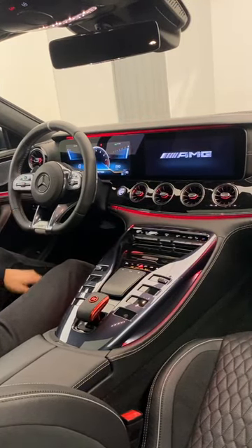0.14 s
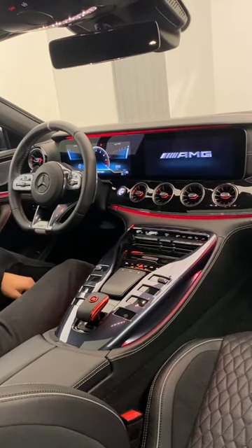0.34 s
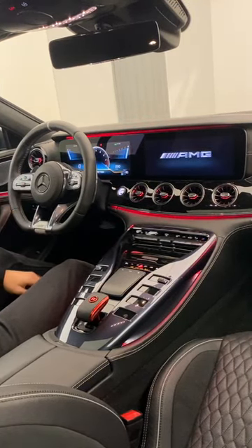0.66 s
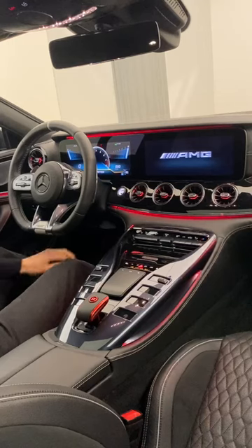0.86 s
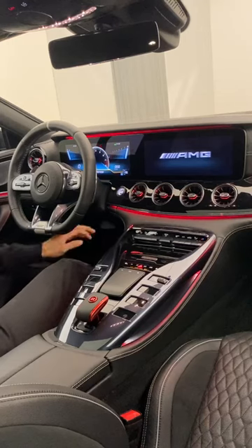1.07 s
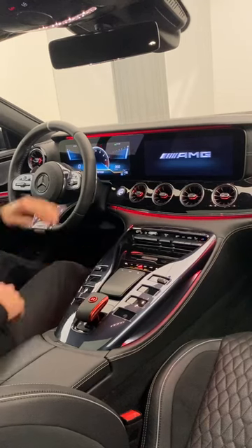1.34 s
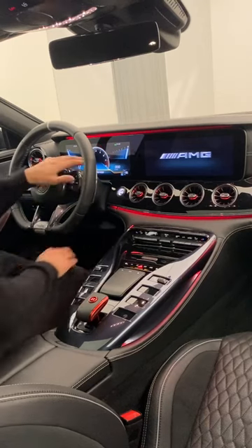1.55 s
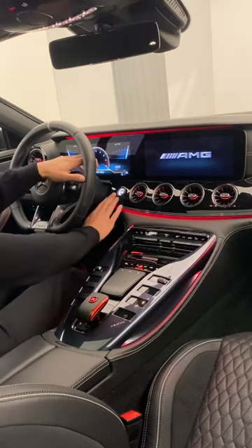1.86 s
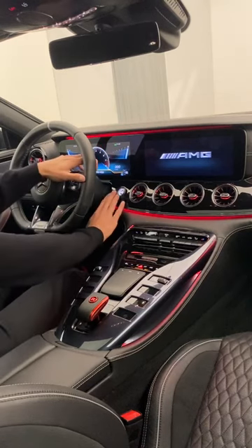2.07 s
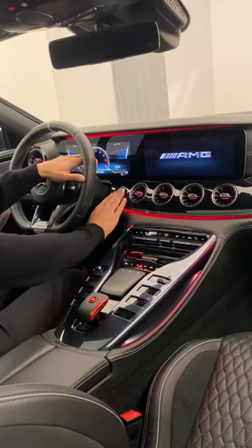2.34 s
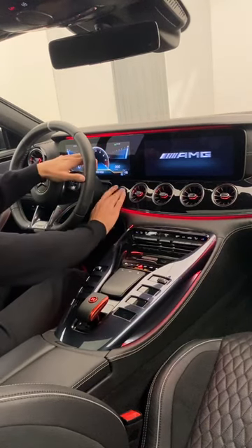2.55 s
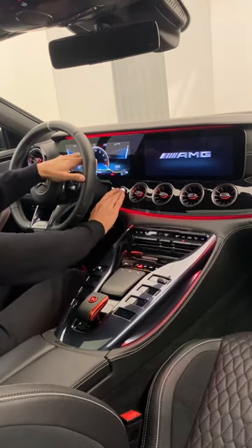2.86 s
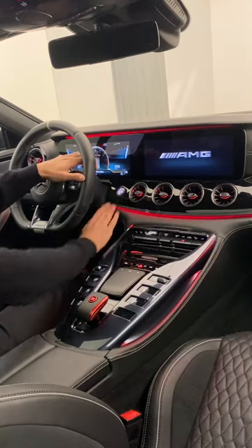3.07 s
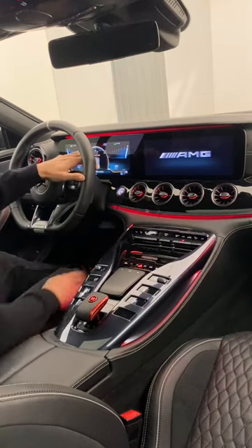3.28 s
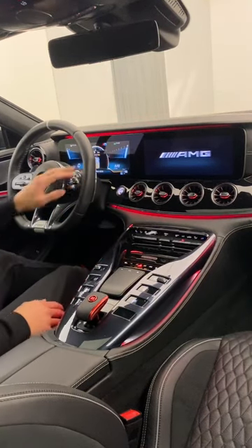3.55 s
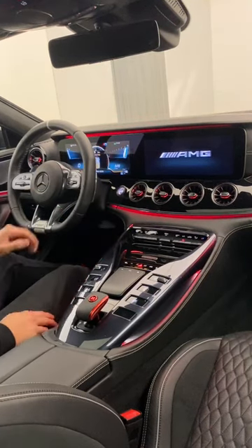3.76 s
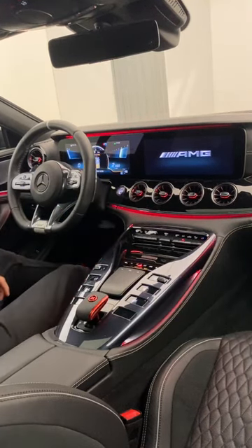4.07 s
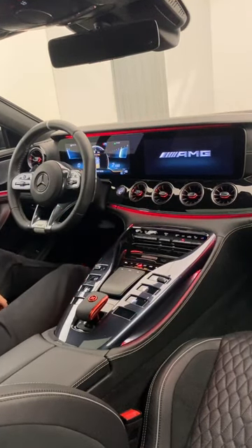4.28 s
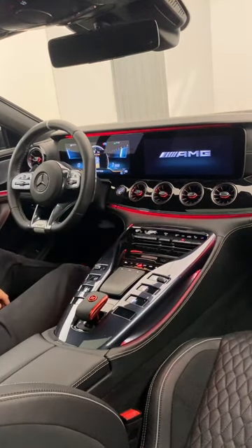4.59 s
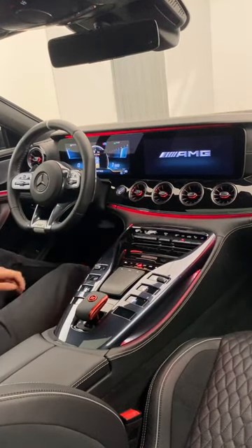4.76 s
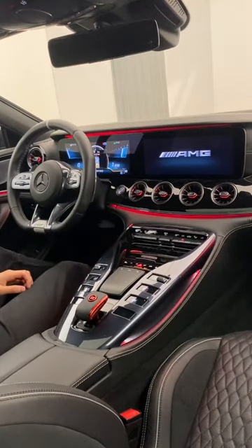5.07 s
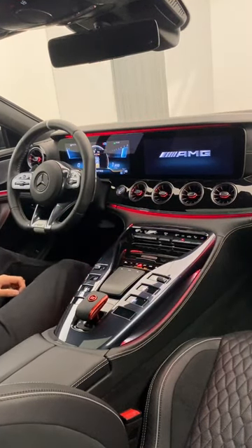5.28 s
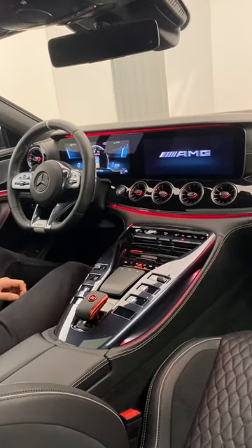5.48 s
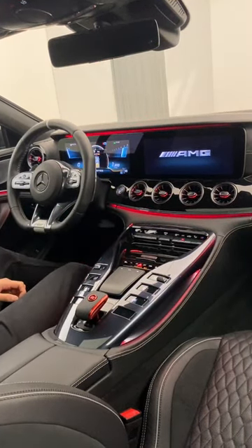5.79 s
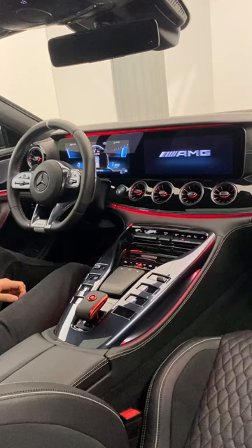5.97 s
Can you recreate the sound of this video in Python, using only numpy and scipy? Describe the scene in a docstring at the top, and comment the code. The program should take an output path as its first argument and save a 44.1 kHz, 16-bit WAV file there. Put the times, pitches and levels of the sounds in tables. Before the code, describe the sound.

Quiet cabin rustle and switch clicks, a dull foot thud, a sharp button click, then an eight-cylinder engine barks awake and sinks into a booming fast idle.

```python
"""An eight-cylinder engine heard from inside a closed car: a starter whirrs it round, it catches, flares,
burbles as the revs fall and settles to a booming fast idle. Its tones follow one firing-rate curve; uneven
firings ring cabin booms, and coloured noise pulses as roar and hiss. Decaying contact rattles ring trim and
switches as clicks, soft pushes ring the floor pan under the pedal, and swelling noise is the driver's seat."""
import sys
import numpy as np
from scipy import signal
from scipy.fft import rfft, irfft
from scipy.io import wavfile

SR = 44100
rng = np.random.default_rng(int(sys.argv[2]) if len(sys.argv) > 2 else 0)


def gain_from_db(level_db):
    """Convert decibel levels to linear amplitude factors (20 dB per decade)."""
    decades = np.asarray(level_db, float) / 20
    return 10 ** decades


def inscribe(sig):
    """Save sig as 16-bit PCM at rate SR to the path in sys.argv[1].

    A 1-D sig is mono; a 2-D sig holds one channel per row.
    Samples are clipped to [-1, 1] before scaling.
    """
    pcm = np.round(np.clip(np.atleast_2d(sig).T, -1, 1) * 32767)
    wavfile.write(sys.argv[1], SR, pcm.astype(np.int16))


N = 270333
HZ = np.maximum(np.arange(N // 2 + 1) * SR / N, 1)   # frequency grid of the whole scene

# cabin booms: (f/Hz, width/Hz, relative level/dB)
CABIN = [(47, 24, -1.5), (74.8, 27, 2), (148.2, 30, -7), (226, 41, -19.5), (267, 58, -27.5)]
# colour of the engine roar: (f/Hz, relative level/dB)
ROAR = [(88, -29), (150, -5), (183, -11.5), (232, -8), (345, -17.5), (492, -25.5), (533, -28), (761, -35),
        (901, -36.5), (985, -36), (1600, -56.5), (2080, -86), (3520, -120)]
# left-right likeness of diffuse sound: (f/Hz, likeness from -1 to 1)
LIKENESS = [(60, 1), (140, 0.9), (350, .6), (830, -0.44), (1400, 0.21), (2000, 0.7), (2800, .1),
            (4300, 0.28), (5200, -0.6), (7500, -.97)]
# balance, the engine side being louder: (f/Hz, left over right/dB)
LEFT_DB = [(30, -0.5), (80, 1.5), (140, 3), (350, 7), (830, 1.5), (2000, -0.5), (4800, -1), (9000, 3)]


def rms_one(x):
    """Scale to unit rms."""
    return x / np.sqrt(np.mean(x ** 2) + 1e-20)


def in_time(rows):
    """Columns of a time curve, read at every sample."""
    s, *columns = np.transpose(rows)
    return [np.interp(np.arange(N) / SR, s, column) for column in columns]


def at_hz(points):
    """A spectrum table read on the frequency grid, along log frequency."""
    hz, value = np.transpose(points)
    return np.interp(np.log(HZ), np.log(hz), value)


def ramp(from_s, rise_s):
    """Straight rise from 0 to 1."""
    return np.clip((np.arange(N) / SR - from_s) / rise_s, 0, 1)


def drift(rate):
    """Slow chance with spread 1: noise smoothed by two equal poles, one knot every 64 samples."""
    knots = rng.standard_normal(N // 64 + 2002)
    r = np.exp(-128 * np.pi * rate / SR)
    smooth = signal.lfilter([1], [1, -2 * r, r * r], knots)[2000:]   # leaves out the filter's start
    return np.interp(np.arange(N) / 64, np.arange(N // 64 + 2), rms_one(smooth))


def ring(x, hz, t60):
    """A unit click sets a sine of height 1 ringing; it falls 60 dB in t60 seconds."""
    r = gain_from_db(-60 / (t60 * SR))
    w = 2 * np.pi * hz / SR
    return signal.lfilter([0, np.sin(w)], [1, -2 * r * np.cos(w), r * r], x + 1e-18)


def ring_width(x, hz, width_hz):
    """A ring whose decay is set by the width of its resonance."""
    return ring(x, hz, np.log(1000) / np.pi / width_hz)


def resonate(x, modes):
    """Parallel resonances of alternating sign, given by centre, width and height."""
    total = 0
    for k, (hz, width_hz, db) in enumerate(modes):
        total = total + gain_from_db(db) * (-1) ** k * width_hz * ring_width(x, hz, width_hz)
    return total


def diffuse(spectrum, lean=1):
    """Stereo noise of a given colour, with left-right likeness set by frequency; rms 1."""
    mid, side = rfft(rng.standard_normal((2, N))) * gain_from_db(at_hz(spectrum))
    alike = np.clip(at_hz(LIKENESS), -1, 1)
    sides = np.sqrt(1 + alike) * mid + np.sqrt(1 - alike) * side * [[1], [-1]]
    balance = gain_from_db(lean * at_hz(LEFT_DB) * [[.5], [-.5]])
    return rms_one(irfft(sides * balance, N))


def ports(x, lean=1):
    """A nearby source reaches the two microphone ports with unequal level and phase."""
    # phase between the ports: (f/Hz, left lead/rad)
    lead = [(50, -0.16), (110, 0.31), (430, 0.64), (750, -2), (1400, -0.1), (2900, 1), (4900, -0.04),
            (7000, 4)]
    tilt = gain_from_db(lean * at_hz(LEFT_DB) / 2) * np.exp(.5j * at_hz(lead))
    return irfft(rfft(x) * [tilt, 1 / tilt], N)


def firing_tone(per_s, turns, shut):
    """A nearly pure tone at the firing rate, as loud as the body lets each pitch through."""
    # firing tone through the body: (f/Hz, level/dB)
    body = [(40, -44), (52, -30.5), (64, -30), (80, -11), (88, -15), (96, -21), (104, -26), (114, -30),
            (128, -18.5), (146, -23.5), (160, -29)]
    overrun_db = -10   # weaker firings with the throttle shut
    tone_db = np.interp(per_s, *np.transpose(body)) + overrun_db * shut
    wave = np.sin(2 * np.pi * turns) + gain_from_db(-32.5) * np.sin(4 * np.pi * turns)
    return np.sqrt(2) * gain_from_db(tone_db) * wave


def belt_hum(turns):
    """A belt-driven hum at a fixed ratio to the firing rate, fading in as the revs settle."""
    ratio, level_db = 1.58, -35
    level = ramp(4.35, .45) * gain_from_db(level_db + 2.5 * drift(7.4))
    return np.sqrt(2) * level * np.sin(2 * np.pi * ratio * turns)


def uneven_firings(per_s, turns, uneven_db, shut):
    """Unequal firing impulses boom in the cabin; alternate firings differ, giving a half-rate tone."""
    # offset of each cylinder's strength from the mean, in firing order: (relative strength)
    cylinders = [1, -0.2, -0.6, -0.9, 0.4, 0.3, -0.5, -0.4]
    fires = np.diff(np.floor(turns), prepend=0)
    strength = rng.standard_normal(N) + np.array(cylinders)[turns.astype(int) % 8]
    boom = rms_one(resonate(fires * strength / np.sqrt(per_s), CABIN))
    wander_db = 3.5 * drift(4.4)   # the unevenness comes and goes
    half_db = uneven_db - 4 + 4.5 * shut + 2 * drift(8)   # grows while the throttle is shut
    return gain_from_db(uneven_db + wander_db) * boom + gain_from_db(half_db) * np.sin(np.pi * turns)


def burbles():
    """Exhaust burbles: short sines with a soft onset and an exponential decay."""
    # burbles in the exhaust: (t/s, level before the envelope/dB, boom f/Hz)
    burble_rows = [(3.221, -30, 55.5), (3.265, -30.5, 53.8), (3.346, -12.5, 65.95), (3.415, -15, 84.25),
                   (3.455, -13, 66.9), (3.48, -20, 131.5), (3.624, -20, 74.5), (3.778, -10, 80.84),
                   (3.824, -13, 65.96), (3.849, -20, 69.5), (3.91, -12, 69.1), (3.958, -10.5, 78.9),
                   (4.039, -18, 78.3), (4.09, -8.5, 69.6), (4.122, -10.5, 104)]
    out = np.zeros(N)
    t = np.arange(SR // 4) / SR
    envelope = (1 - np.exp(-t / 0.0037)) * np.exp(-t / 0.027)
    for s, level_db, hz in burble_rows:
        at = round(s * SR)
        out[at:at + len(t)] += gain_from_db(level_db) * np.sin(2 * np.pi * hz * t) * envelope
    return out


def engine_roar(roar_db, pulse):
    """Diffuse noise pulsing with the firings, with dashboard rings that grow under load."""
    # dashboard rings: (f/Hz, width/Hz, relative level/dB)
    dash = [(531, 46, -15.5), (720, 89, -22.5), (890, 69, -20.5), (1068, 48, -26)]
    rings = 0
    for hz, width_hz, db in dash:
        noise = diffuse(LIKENESS)   # as a colour this table is nearly flat
        rings = rings + gain_from_db(db) * rms_one(ring_width(noise, hz, width_hz))
    level = gain_from_db(roar_db + 0.83 * drift(24) + 0.67 * drift(45))
    return level * pulse * (diffuse(ROAR) + rings * gain_from_db(0.43 * (roar_db + 35.5)))


def engine_hiss(hiss_db, pulse):
    """High noise that pulses with the firings."""
    # colour of the hiss: (f/Hz, relative level/dB)
    hiss_colour = [(700, -28), (1200, -5.5), (2000, -12), (2700, -10), (4300, -16), (6000, -14.5),
                   (8500, -24), (11000, -22.5), (13000, -58)]
    return gain_from_db(hiss_db + drift(19)) * pulse * diffuse(hiss_colour)


def panel_drone():
    """Noise through doubled resonances: a panel drones faintly, then suddenly strongly."""
    # panel resonances, each passed twice: (f/Hz, width/Hz, relative level/dB)
    panel_modes = [(366, 36, -2.5), (466, 40, -6)]
    faint_db, strong_db = -57.5, -47.5
    level_db = faint_db + (strong_db - faint_db) * ramp(5.74, .03)
    drone = rms_one(resonate(resonate(diffuse(ROAR), panel_modes), panel_modes))
    return gain_from_db(level_db) * ramp(3.3, 0.33) * drone


def dash_buzz(per_s):
    """A dash part buzzes at high revs: narrow noise that enters above a set firing rate."""
    mode = [(920, 60, 0)]   # f/Hz, width/Hz, level/dB
    buzz = rms_one(resonate(resonate(diffuse(LIKENESS), mode), mode))
    above_per_s, onset_per_s = 105, 15
    revs_gate = np.clip((per_s - above_per_s) / onset_per_s, 0, 1)
    return gain_from_db(-58 + 2.5 * drift(24)) * revs_gate * buzz


def electrical_whine():
    """A thin, steady electrical sine that fades in once the engine runs."""
    t = np.arange(N) / SR
    return np.sqrt(2) * gain_from_db(-92.5) * ramp(3.9, .5) * np.sin(2 * np.pi * 11920 * t)


def engine():
    """One firing-rate curve drives tones, booms, roar and hiss as the engine catches, flares and settles."""
    # engine speed: (t/s, firings per second)
    speed = [(3.15, 40), (3.3, 56), (3.38, 86.5), (3.5, 130), (3.59, 157), (3.8, 154), (3.95, 131),
             (4.12, 109), (4.21, 101.5), (4.32, 95.5), (4.5, 87.7), (4.89, 83.6), (5.3, 81.7), (6.13, 79)]
    # levels under load: (t/s, uneven firings level/dB, roar level/dB, hiss level/dB)
    load = [(3.1, -44.5, -54.5, -71), (3.27, -37, -52.5, -63), (3.34, -24, -39, -64.5),
            (3.6, -26, -34, -62), (3.9, -26, -37.5, -65.5), (4.12, -24, -37.5, -68.5),
            (4.2, -32, -40.5, -68.5), (4.5, -32.5, -43.5, -74), (4.75, -35, -45, -72.5),
            (5.3, -39, -46, -77), (6.13, -41.5, -47.5, -78)]
    per_s, = in_time(speed)
    uneven_db, roar_db, hiss_db = in_time(load)
    turns = np.cumsum(per_s) / SR   # firings so far
    shut_s, reopen_s, move_s = 3.62, 4.09, 0.045   # throttle shut while the revs fall
    shut = ramp(shut_s, move_s) - ramp(reopen_s, move_s)
    pulse = 1 + 0.14 * np.cos(2 * np.pi * turns)
    near = firing_tone(per_s, turns, shut) + belt_hum(turns)
    near += uneven_firings(per_s, turns, uneven_db, shut) + burbles()
    spread = engine_roar(roar_db, pulse) + engine_hiss(hiss_db, pulse)
    spread += panel_drone() + dash_buzz(per_s) + electrical_whine()
    running = ramp(load[0][0], 0.049)
    return running * (ports(near) + spread)


def starter():
    """A low whirr of coloured noise while the starter drags the engine round."""
    # starter turning the engine over: (t/s, level/dB)
    crank = [(2.66, -50), (2.762, -40.5), (2.9, -44.5), (3.112, -41), (3.262, -41.5), (3.36, -29.5)]
    # colour of the whirr: (f/Hz, relative level/dB)
    whirr_colour = [(15, -30), (25, -5.5), (53, 3.5), (157, -7), (274, -13), (488, -29.5), (1260, -35.5),
                    (1580, -40.5), (1890, -44), (4380, -51), (5000, -65), (6500, -93.5), (11000, -120)]
    t = np.arange(N) / SR
    engaged = ramp(crank[0][0], 0.079) * np.clip((crank[-1][0] - t) / 0.031, 0, 1)
    return engaged * gain_from_db(in_time(crank)[0] + 0.64 * drift(6.7)) * diffuse(whirr_colour)


def clicks():
    """Each click is a dying rattle of contacts ringing trim modes and one ring of its own; its knock is a scuff."""
    # trim and switches: (t/s, main ring level/dB, main ring f/Hz, low knock level/dB, high tick level/dB)
    click_rows = [(0.278, -59, 681, -63, -88), (0.647, -65, 1500, -58.5, -50.5),
                  (0.744, -41.5, 740, -55.5, -53), (1.002, -51.5, 1100, -44, -63),
                  (1.186, -61, 700, -40, -69), (1.202, -70, 900, -37.5, -60),
                  (1.219, -61, 1056, -37.5, -50.5), (1.73, -65.5, 3020, -80, -58),
                  (1.768, -58, 3120, -70, -38.5), (2.005, -56, 1240, -52.5, -65.5),
                  (2.04, -56.5, 4000, -65, -50.5), (2.114, -48, 1430, -44.5, -45),
                  (2.255, -49.5, 660, -49.5, -52), (2.407, -37, 830, -41.5, -33),
                  (2.414, -31.5, 1098, -39.5, -47), (2.742, -54.5, 1580, -38, -72),
                  (2.835, -48.5, 2850, -50, -43), (2.878, -23.5, 1361, -41, -21),
                  (2.886, -44, 1150, -32.5, -33), (3.239, -57.5, 3800, -41, -36),
                  (3.277, -43.5, 3200, -35, -46), (4.124, -51.5, 1208, -40, -54),
                  (4.473, -45.5, 780.5, -46, -61), (4.482, -49, 1563, -44, -68.5),
                  (5.166, -51, 1258, -48, -72.5)]
    # trim modes: (centre f/Hz, relative level/dB, t60/s)
    trim = [(172, 3, 0.032), (270.3, 3, .07), (351.4, -5.5, 0.091), (822, -4.5, 0.06), (1154, -8, 0.02),
            (1390, -2.5, 0.008), (2650, 8.5, 0.006), (3200, 5, 0.0062), (4030, 3.5, 0.0044),
            (4674, 1, 0.0032), (5900, 5.5, 0.005), (6680, 8.5, 0.014), (7400, 2.5, 0.004)]
    rattle_t60_s, knock_t60_s, own_t60_s = 0.033, 0.051, .007
    tick_filter = signal.butter(4, 2700, "high", fs=SR, output="sos")   # the tick has no body
    crack_filter = signal.butter(6, 8400, fs=SR, output="sos")
    out, t = np.zeros(N), np.arange(SR // 5) / SR
    for s, main_db, own_hz, knock_db, tick_db in click_rows:
        rattle = rng.standard_normal(len(t)) * gain_from_db(-60 * t / rattle_t60_s) * np.minimum(t / .0015, 1)
        rattle[SR // 1000] += 9.0   # the first full contact is the hardest
        # the low knock is a softer, longer scuff
        scuff = rng.standard_normal(len(t)) * gain_from_db(-60 * t / knock_t60_s) * np.minimum(t / 0.0078, 1)
        parts = np.zeros((3, len(t)))   # knock, main ring, tick
        own = ring(ring(rattle, own_hz, own_t60_s), own_hz, own_t60_s)   # a steep-sided ring
        parts[1] = 7.7 * own / np.max(np.abs(own))
        for (hz, db, t60), size in zip(trim, rng.standard_normal(len(trim))):
            part = int(hz > 600) + int(hz > 2200)
            # main modes near the part's own ring answer best
            far_db = 15.0 * abs(np.log2(hz / own_hz)) * (part == 1)
            varied_hz = hz * (1 + 0.044 * size)   # every part is a little different
            parts[part] += gain_from_db(db - far_db) * ring(rattle if part else scuff, varied_hz, t60)
        parts[2] += 0.2 * np.diff(rattle, 2, prepend=[0, 0]) / 2   # the bare crack of the contact
        parts[2] = signal.sosfilt(tick_filter, parts[2])
        parts /= np.max(np.abs(parts), axis=1, keepdims=True)
        out[round(s * SR):][:len(t)] += gain_from_db(np.array([knock_db, main_db, tick_db])) @ parts
    # glass and dash throw a short tail back
    echoes = rng.standard_normal(SR // 10) * gain_from_db(-60 * t[:SR // 10] / .06)
    echoes /= np.sqrt(np.sum(echoes ** 2))
    out += gain_from_db(-10.5) * signal.fftconvolve(out, echoes)[:N]
    return ports(signal.sosfilt(crack_filter, out), lean=.3)


def pedal():
    """Soft half-sine pushes, each followed by a dying shudder, ring the floor pan and the cabin."""
    # foot on the pedal: (t/s, push level/dB, contact/ms)
    thumps = [(0.973, -41, 1.3), (1.012, -39.5, 2.3), (1.247, -16.5, 2.3), (1.258, -10.5, 2.2)]
    # floor pan modes: (f/Hz, relative level/dB, t60/s)
    floorpan = [(50.75, -16.5, 0.76), (65.4, -19.5, 0.51), (71, 1.5, 0.11), (100.2, -1.5, 0.033),
                (130.1, -21, .6), (176, -17.5, 0.091), (289, -16, 0.06), (416, -27, .06)]
    push = np.zeros(N)
    for s, push_db, ms in thumps:
        t = np.arange(round(ms * SR / 1000))
        push[round(s * SR) + t] += gain_from_db(push_db) * np.sin(np.pi * t / len(t)) / len(t)
    # the body keeps shaking after a push
    shudder_t60_s = 0.86
    shaking = signal.lfilter([1], [1, -gain_from_db(-60 / (shudder_t60_s * SR))], push)
    shudder = gain_from_db(-38) * shaking * rng.standard_normal(N) / np.sqrt(SR / 10)
    pan = sum(gain_from_db(db) * ring(push, hz, t60) for hz, db, t60 in floorpan)
    return ports(pan + resonate(shudder, CABIN[:3]))


def seat():
    """The cushion rumbles and cloth rustles in noise swells as the driver moves, over a faint hiss."""
    # cushion under the moving driver: (t/s, level/dB)
    moves = [(0.0, -62.5), (0.6, -70), (1.01, -57), (1.17, -59.5), (1.24, -48), (1.36, -68), (1.86, -64),
             (2.53, -60), (2.75, -69.5)]
    # colour of the cushion: (f/Hz, relative level/dB)
    cushion_colour = [(12, -37.5), (20, -4), (48, 1), (76, 3), (149, -9.5), (206, -8.5), (728, -19),
                      (797, -16.5), (905, -25), (1500, -25), (1950, -59), (3300, -120)]
    # colour of cloth and air: (f/Hz, relative level/dB)
    cloth_colour = [(300, -20), (600, -8.5), (1100, -6), (1600, -12.5), (2200, -11), (2800, -8),
                    (4000, -13), (6000, -12.5), (9000, -18.5), (11500, -21), (14000, -63)]
    # swells of cloth rustle: (start t/s, length/s, level/dB)
    rustles = [(-.03, 0.093, -67.5), (0.588, 0.29, -68.5), (0.895, 0.26, -65.5), (1.109, 0.2, -67),
               (1.281, .4, -69.5), (1.979, 0.26, -80), (2.233, 0.061, -70), (2.713, 0.073, -71),
               (2.855, 0.047, -49.5), (4.085, 0.092, -62.5), (4.695, .1, -72.5)]
    swells = 0
    for s, length_s, db in rustles:
        swells = swells + gain_from_db(db) * np.sin(np.pi * ramp(s, length_s)) ** 1.7
    flicker = gain_from_db(3.1 * drift(14) + 2 * drift(60) + 1.3 * drift(250))
    air = gain_from_db(-82)   # steady hiss of the still cabin
    cloth = (air + swells * flicker) * diffuse(cloth_colour, lean=.3)
    cushion = gain_from_db(in_time(moves)[0] + 2 * drift(8)) * diffuse(cushion_colour, lean=.3)
    return cushion + cloth


def scene():
    """Everything heard in the cabin."""
    return engine() + starter() + clicks() + pedal() + seat()


def band_limit(x):
    """A steep low-pass at the top of the band."""
    return signal.sosfilt(signal.butter(12, 12120, fs=SR, output="sos"), x)


def record(dry):
    """Deep bass is cut from the finished mix."""
    bass_cut = signal.butter(2, 30, "high", fs=SR, output="sos")
    mix = signal.sosfilt(bass_cut, dry)
    return band_limit(mix)


dry = scene()
out = record(dry)
inscribe(out)
```